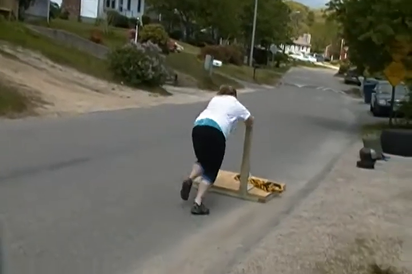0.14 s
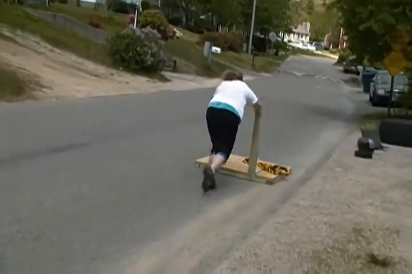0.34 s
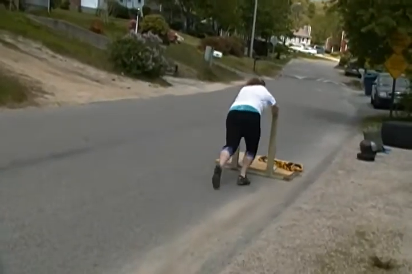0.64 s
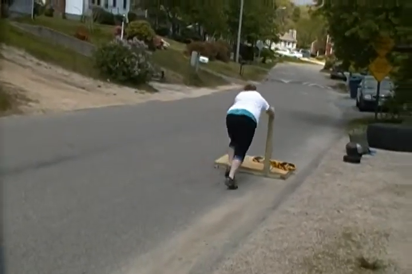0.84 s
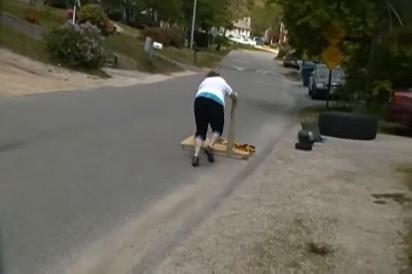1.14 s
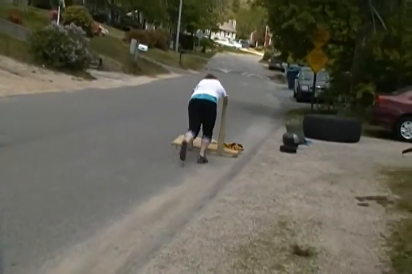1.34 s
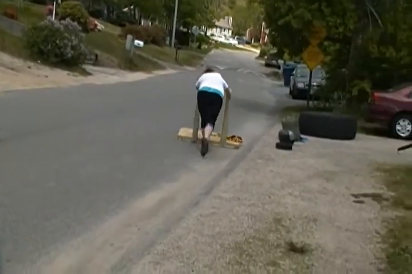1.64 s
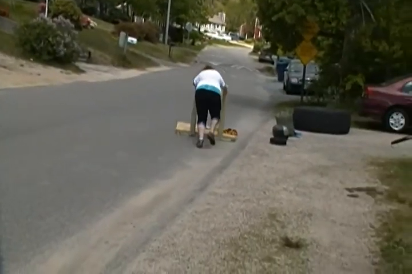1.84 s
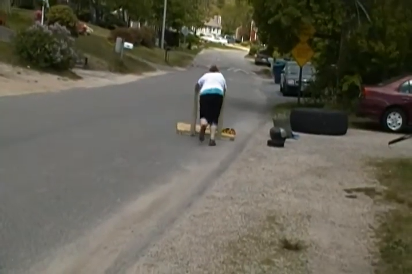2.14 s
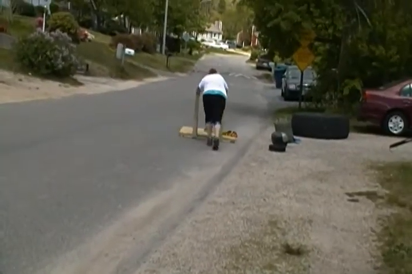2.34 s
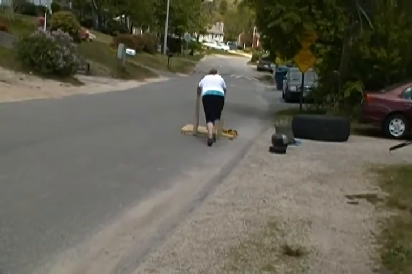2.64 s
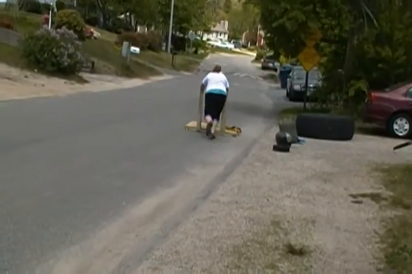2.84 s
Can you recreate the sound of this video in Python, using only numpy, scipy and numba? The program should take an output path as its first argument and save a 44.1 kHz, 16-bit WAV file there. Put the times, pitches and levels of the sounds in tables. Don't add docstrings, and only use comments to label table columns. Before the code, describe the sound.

A wooden sled is pushed away along a gritty paved street, scraping and rattling continuously, with sharp stone cracks and snags; it grows quieter while low wind buffets the small camera microphone outdoors.

```python
import sys
import numpy as np
from scipy import signal
from scipy.fft import rfft, irfft, next_fast_len
from scipy.io import wavfile
from scipy.ndimage import uniform_filter1d
from numba import njit

SR = 44100
rng = np.random.default_rng(int(sys.argv[2]) if len(sys.argv) > 2 else 0)


def nominal_scale(level):
    x = np.asarray(level, float) / 20
    return 10 ** x


def digitize_waveform(pressure):
    field = np.atleast_2d(pressure).T
    bounded = np.clip(field, -1, 1)
    quanta = np.round(bounded * 32767).astype(np.int16)
    wavfile.write(sys.argv[1], SR, quanta)


N = 131859


def unit(x):
    return x / np.sqrt(np.mean(x ** 2))


def even(x):
    window_s, share = .065, .7
    power = uniform_filter1d(x ** 2, size=int(window_s * SR)) + 1e-12
    return unit(x / power ** (share / 2))


def curve(table, column=1):
    table = np.array(table)
    return np.interp(np.arange(N) / SR, table[:, 0], table[:, column])


def walk(rate):
    hold = int(SR / rate)
    steps = np.repeat(rng.standard_normal(N // hold + 1), hold)
    return unit(uniform_filter1d(uniform_filter1d(steps, hold), hold)[:N])


def clicks(rate, spread_db):
    when, sign, size = rng.random((3, N))
    return (when < rate / SR) * np.sign(sign - .5) * nominal_scale(-spread_db * np.log(size + 4e-3))


@njit
def svf(x, hz, width):
    y, band, low = np.empty(len(x)), 0., 0.
    for i in range(len(x)):
        g, k = np.tan(np.pi * hz[i] / SR), width / hz[i]
        v = (band + g * (x[i] - low)) / (1 + g * (g + k))
        band, low, y[i] = 2 * v - band, low + 2 * g * v, k * v
    return y


def colour(x, points):
    hz, db = np.array(points).T
    size = next_fast_len(N)
    log_hz = np.log(np.arange(size // 2 + 1) * SR / size + 1)
    return irfft(rfft(x, size) * nominal_scale(np.interp(log_hz, np.log(hz), db)), size)[..., :N]


# time in seconds, scrape level in dB, grit in dB relative to the scrape.
LOAD = [(0, -15, -2), (.17, -16.5, -4), (.32, -13.5, -3.5), (.5, -14, -11.5), (.68, -14.5, -10.5),
        (.87, -16.5, -5.5), (.95, -22.5, -5.5), (.99, -15, -5.5), (1.1, -17, -4), (1.28, -20.5, -4),
        (1.5, -18, -4.5), (1.63, -16.5, -7), (1.9, -20.5, -2.5), (2.38, -19.5, -4.5), (2.55, -22, -3),
        (2.69, -17.5, -2.5), (2.8, -24, -3), (2.99, -21.5, -3)]
# frequency in Hz, spectrum level in dB per Hz.
GRIT_COLOUR = [(600, -29), (1000, -1), (1810, 0), (2740, -7.5), (5120, -10), (6840, -16), (8880, -23),
               (11500, -9)]


def scrape():
    rough = nominal_scale(.8 * walk(14) + 2.44 * walk(45.69))
    bumps = clicks(2500, 3.5) * rough
    planks = unit(boards(bumps))
    slips = unit(frame(-np.abs(clicks(400, 1.5)) * rough))
    grit = grit_crackle(rough)
    grit_level = nominal_scale(curve(LOAD, column=2))
    return nominal_scale(curve(LOAD)) * (even(planks + nominal_scale(-4) * slips) + grit_level * even(colour(grit, GRIT_COLOUR)))


def grit_crackle(rough):
    grit = rng.standard_normal(N) * nominal_scale(0.95 * walk(20))
    busy = nominal_scale(2.9 * walk(34.94))
    for hz in 1700 * 1.327 ** np.arange(7):
        cluster = rough * busy * nominal_scale(1.24 * walk(25.8))
        grain_hz = hz * (1 + 0.095 * walk(60))
        ticks = clicks(1300 / 7, 3.3) * cluster
        grains = svf(svf(ticks, grain_hz, hz / 5), grain_hz, hz / 4)
        grit = grit + nominal_scale(-14.5) * unit(ticks)
        grit = grit + nominal_scale(-2) * unit(grains) * np.sqrt(hz / SR)
    return grit


# frequency in Hz, bandwidth in Hz, level in dB.
BOARD_MODES = [(149.5, 19.5, -7.5), (227, 21.5, -1.5), (274.6, 53, 0.5), (409, 75, -0.5), (501.4, 64, -2.5),
               (607, 152, -4), (788, 153, -0.5), (943, 102, -5.5), (1463, 124, -4.5), (1666, 570, -6.5)]


def boards(push):
    out = np.zeros(N)
    for k, (hz, width_hz, db) in enumerate(BOARD_MODES):
        level = (-1) ** k * nominal_scale(db + 1.62 * walk(9.19))
        pitch = hz * (1 + 0.036 * walk(3.83))
        out += level * even(svf(push, pitch, 1. * width_hz))
    return out


# frequency in Hz, bandwidth in Hz, level in dB.
FRAME_MODES = [(305, 298, 6), (752, 260, -3), (1500, 490, -20.5)]


def frame(push):
    still, slip_s = np.ones(N), .0005
    soft_edge = signal.windows.hann(int(slip_s * SR)) * 2 / (slip_s * SR)
    push = np.convolve(push, soft_edge)[:N]
    return sum(nominal_scale(db) * svf(push, hz * still, 1. * width_hz) * SR / (2 * np.pi * width_hz)
               for hz, width_hz, db in FRAME_MODES)


# time in seconds, pitch in Hz, level in dB, overtones in dB relative to that level.
DECK_CHATTER = [(0, 117.5, -20.5, -1), (.5, 105.2, -27, -25), (.72, 105.2, -23, -12), (.8, 105, -15.5, -22),
                (.86, 107.7, -19, -4), (.93, 110.1, -17.5, -21), (1.02, 112, -22, -19),
                (1.15, 111.6, -22.5, -12), (1.3, 105.2, -24.5, -7), (1.52, 108, -18.5, -1),
                (1.64, 108.4, -22, 5), (1.75, 106.7, -16.5, -5.5), (1.97, 110.4, -18.5, -14.5),
                (2.25, 118.2, -24, -11.5), (2.47, 99.86, -17, -13.5), (2.7, 115, -17.5, -7.5),
                (2.99, 95, -27, -15)]


def deck():
    hz = curve(DECK_CHATTER)
    phase = 2 * np.pi * np.cumsum(hz * (1 + 0.05884 * walk(40))) / SR
    over = sum(nominal_scale(3.0 * walk(14)) * np.sin(k * phase + k * k) / (k - 1) for k in (2, 3, 4))
    fundamental = nominal_scale(1.5 * walk(20)) * np.sin(phase)
    hum = np.sqrt(2) * (fundamental + nominal_scale(curve(DECK_CHATTER, column=3)) * over)
    blur = even(svf(svf(rng.standard_normal(N), hz, 51.0), hz, 127.0))
    return nominal_scale(curve(DECK_CHATTER, column=2) - 2) * (hum + nominal_scale(0.5) * blur)


# start in
# seconds, peak in dB, ring in Hz, tap on the runner in dB relative to the peak.
CAUGHT_STONES = [(0.061, -15, 3160, 9), (0.1394, -10, 4340, 5), (0.2042, -4, 3160, -14),
                 (0.232, -6, 3580, -12), (0.288, -5.5, 3460, -5), (0.3434, -14, 2940, 3),
                 (0.3637, 3.5, 2940, -22), (0.5255, -9, 3970, -6), (0.6945, -8.5, 3530, -5),
                 (0.7247, -4.5, 2650, -3), (0.825, -7, 4330, -6), (0.8664, -8.5, 3240, -8),
                 (1.0943, -19, 3660, 2), (1.261, -13.5, 5050, 4), (1.3118, -16, 4040, -12),
                 (1.4176, -7.5, 5170, 2.5), (1.4702, -12, 3200, -16), (1.511, -7, 3180, -21),
                 (1.5946, -10, 3160, -6), (1.6077, -4.5, 3380, -4), (1.6944, -14, 5200, 1),
                 (1.7183, -7, 5330, -18), (1.803, -9, 3640, 0), (1.825, -9, 5000, -10),
                 (1.8722, -2, 3930, -6.5), (1.8893, -8, 3700, -0.5), (1.937, -10, 2500, -14),
                 (2.1239, -5.5, 5350, -8.5), (2.2703, -7.5, 4010, 0)]
MORE_STONES = [
    (1.8365, -12, 5170, -2),
    (2.017, -14.5, 3470, 3),
    (2.3415, -10.5, 3210, 0),
    (2.5553, -15, 3550, -7),
    (2.8572, -5, 2870, -17),
    (2.8698, -5.5, 2980, -8.5),
    (2.8853, -9, 4330, -27),
    (2.9569, -4.5, 4930, 0.5),
]
FURTHER_STONES = [(.1052, -18, 5000, -5), (.19, -16, 5500, -4), (0.4544, -13, 3160, -6),
                  (0.5095, -17, 5900, -7), (.5531, -11.5, 3320, -14), (0.63, -16, 7440, -14),
                  (.6754, -16, 3180, -6), (0.773, -15.5, 4500, 7.5), (.838, -6.5, 5730, -17),
                  (0.8803, -8.5, 3630, -9), (0.9885, -10, 3260, -9), (1.028, -16, 2970, -2),
                  (1.0503, -11, 4100, -6), (1.3658, -15, 4200, 2.5), (1.3972, -16, 3870, -4),
                  (1.537, -6.5, 3080, -14), (1.685, -21, 4900, 3), (1.8445, -12, 5300, -7),
                  (2.0514, -14.5, 3000, -3), (2.1794, -11.5, 2790, -5), (2.2992, -18, 3500, 1),
                  (2.369, -17, 3500, 3), (2.6367, -16, 3220, -2)]
# centre in seconds, level in dB.
STONE_CRUNCHES = [(0.062, -24.5), (.145, -20), (0.356, -17.5), (0.838, -25), (0.999, -20.5), (1.075, -19.5),
                  (1.425, -19.5), (1.619, -19.5), (2.127, -21), (2.278, -17), (2.688, -32), (2.867, -18)]
# start in seconds, peak in dB.
RUNNER_SNAGS = [(0.197, -1), (0.439, 2), (0.493, -1.5), (0.772, 0), (0.976, 2.5), (0.996, -3), (1.057, 1.5),
                (1.078, 4), (1.423, 4), (1.567, -12), (1.593, 7.5), (1.612, 7), (1.652, 9), (1.658, -4),
                (2.676, -5.5), (.512, 4), (.628, -2), (1.637, -3), (1.678, -8), (.042, -8), (0.128, -5),
                (.23, -3), (.689, -9), (1.038, -11), (1.369, -5), (1.405, -9), (2.02, -2.5), (2.115, -4),
                (2.719, -4)]
# frequency in Hz, spectrum level in dB per Hz.
CRACK_COLOUR = [(1000, -0.5), (1700, 2.5), (2500, -5.5), (3300, -1.5), (5000, -2.5), (7000, -14),
                (9000, -14.5), (14000, -24)]


def stones():
    stone_s, ring_s, runner_hz, runner_s, crunch_s = 0.0013, 0.00075, 1713, 0.00097, 0.01
    t = np.arange(1024) / SR
    every = CAUGHT_STONES + MORE_STONES + FURTHER_STONES
    crack, ring, jolt = np.zeros((3, N + 4096))

    def swell_and_die(length):
        return t / length * np.exp(1 - t / length)

    def bell(hz, length):
        return np.sin(2 * np.pi * hz * t) * swell_and_die(length)

    for (s, db, hz, tap_db), noise in zip(every, rng.standard_normal((len(every), 1024))):
        at = slice(int(s * SR), int(s * SR) + 1024)
        crack[at] += nominal_scale(db - 10.0) * noise * swell_and_die(stone_s)
        ring[at] += nominal_scale(db - 7.0) * bell(hz, ring_s)
        ring[at] += nominal_scale(db - 14) * bell(min(hz * 1.63, 9000), ring_s)
        ring[at] += nominal_scale(db + tap_db) * bell(runner_hz * (1 + 0.07 * noise[0]), runner_s)
    for s, db in RUNNER_SNAGS:
        jolt[int(s * SR) + 40] -= nominal_scale(db - 4.0)

    time = np.arange(N) / SR
    swell = sum(nominal_scale(db) * np.exp(-((time - s) / crunch_s) ** 2) for s, db in STONE_CRUNCHES)
    crunch = swell * unit(rng.standard_normal(N) * nominal_scale(2.7 * walk(400)))
    gain = 1 / np.std(colour(rng.standard_normal(N), CRACK_COLOUR))
    cracks = gain * colour(crack[:N] + crunch, CRACK_COLOUR)
    return cracks + ring[:N] + frame(jolt[:N] + nominal_scale(-23.5) * crunch)


def street(sled):
    decay_s = 0.13
    t = np.arange(8192) / SR
    tails = rng.standard_normal((2, 8192)) * np.exp(-t / decay_s) / np.sqrt(decay_s * SR / 2)
    thin = colour(sled, [(100, -8), (500, -12), (2570, -1), (7000, 5)])
    return nominal_scale(-11.5) * signal.fftconvolve(thin[None], tails, axes=1)[:, :N]


# time in seconds, level in dB.
GUST_LEVELS = [(0, -22.5), (.07, -25), (.14, -52), (1.35, -49), (1.65, -42), (1.78, -29), (1.86, -17),
               (1.96, -44), (2.03, -20), (2.08, -25), (2.2, -12.5), (2.28, -39), (2.38, -14), (2.5, -23),
               (2.62, -76), (2.77, -16), (2.85, -26.5), (2.99, -33)]
# frequency in Hz, spectrum level in dB per Hz.
WIND_COLOUR = [(8.8, -43), (15, -28), (102, 3.5), (224, -13), (345, -20), (559, -31), (700, -40),
               (910, -69), (1540, -120)]


def wind():
    gust = curve(GUST_LEVELS)

    def buffeting():
        return unit(colour(rng.standard_normal(N), WIND_COLOUR)) * nominal_scale(gust + 5.5 * walk(13))

    both, apart = buffeting(), buffeting()
    rumble = unit(colour(rng.standard_normal(N), [(10, 12), (28, 4), (60, 11.5), (100, -34)]))
    rumble = rumble * nominal_scale(2.9 * walk(7.05))
    slow_gust = uniform_filter1d(gust, size=8000)
    rumble = nominal_scale(-3.5) * rumble * (nominal_scale(-40) + nominal_scale(slow_gust + 4.5))
    return nominal_scale(-3) * both + rumble + apart * np.array([[1.2], [-1]])


def scene():
    port_lag_s = 1.5e-5
    sled = scrape() + deck() + stones()
    lag = port_lag_s * SR * np.gradient(sled) / 2
    return np.array([sled + lag, sled - lag]) + street(sled) + wind()


BRIGHT_MOMENTS = (.25, .74, 1.25, 1.47, 1.72, 2.1)
# start in seconds, level in dB.
TOP_OPENINGS = [
    (.7248, -29),
    (1.261, -21),
    (1.719, -26),
    (1.8725, -4),
    (2.124, -32),
    (2.957, -3),
]


def patches(x, low_hz, share):
    bright_s, opening_s, strip_hz = .07, 0.0032, 150
    size, t = next_fast_len(N), np.arange(N) / SR
    full, hz = rfft(x, size), np.arange(size // 2 + 1) * SR / size
    busy = sum(np.exp(-((t - s) / bright_s) ** 2) for s in BRIGHT_MOMENTS)
    opened = sum(nominal_scale(db) * np.exp(-((t - s - opening_s / 2) / opening_s) ** 2) for s, db in TOP_OPENINGS)
    out = opened * irfft(full * (hz >= low_hz) * (hz < 15700), size)[:N]
    for edge_hz in np.arange(low_hz, 11200., strip_hz):
        chance = 1.5 * busy + walk(16)
        gate = 1. * (chance > np.quantile(chance, 1 - share))
        gate = uniform_filter1d(uniform_filter1d(gate, size=700), size=700)
        out = out + gate * irfft(full * (hz >= edge_hz) * (hz < edge_hz + strip_hz), size)[:N]
    return out


def band_limit(x):
    return signal.sosfilt(signal.butter(12, 15700, fs=SR, output="sos"), x)


def record(dry):
    ceiling = .96
    soft = ceiling * dry / (ceiling ** 4 + dry ** 4) ** (1 / 4)
    sides = []
    for x, (top_hz, patch_db, share) in zip(soft, [(8220, -7.5, .2), (9254, -9.5, .06)]):
        below = colour(x, [(top_hz * 0.99, 0), (top_hz, -4), (top_hz * 1.02, -110)])
        sides.append(below + nominal_scale(patch_db) * patches(x, top_hz, share))
    return band_limit(np.array(sides))


dry = scene()
out = record(dry)
digitize_waveform(out)
```